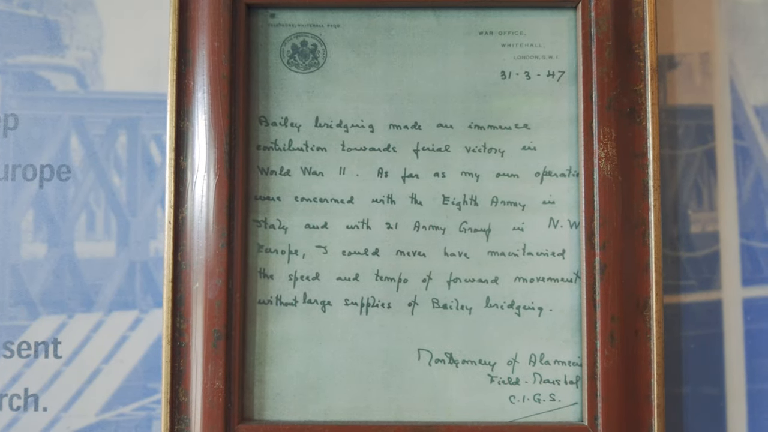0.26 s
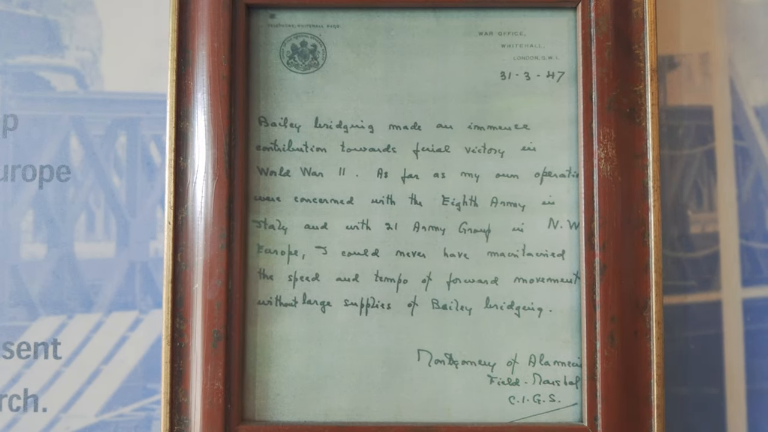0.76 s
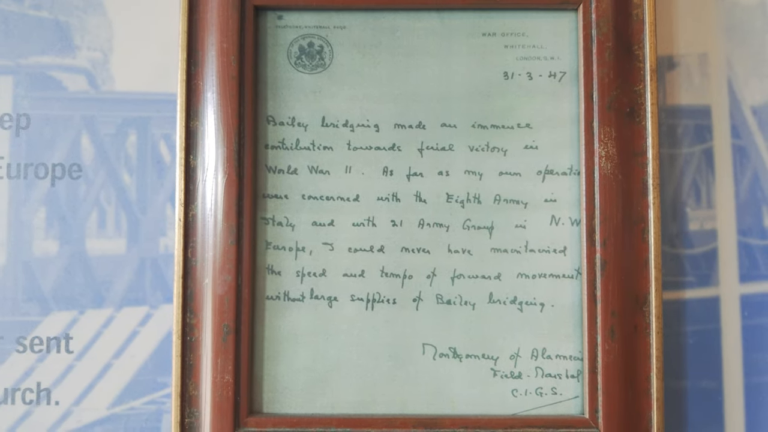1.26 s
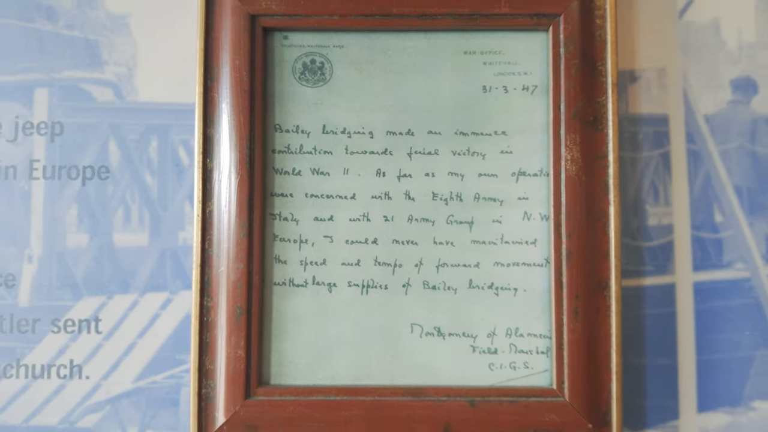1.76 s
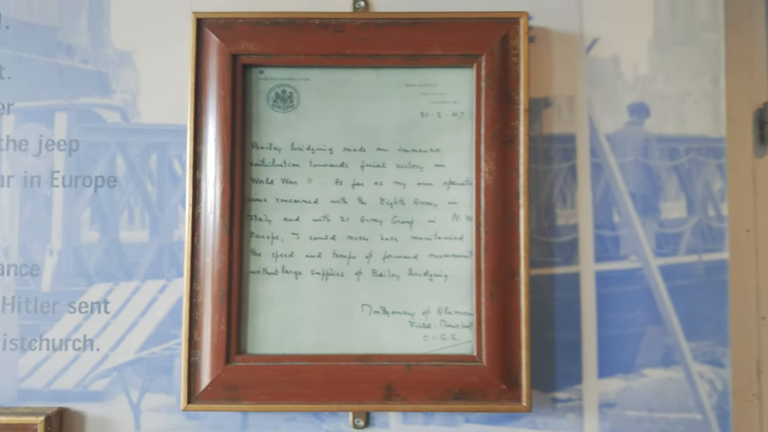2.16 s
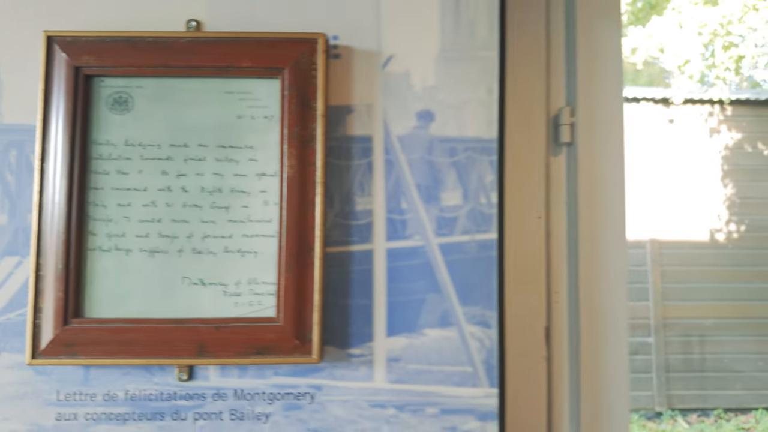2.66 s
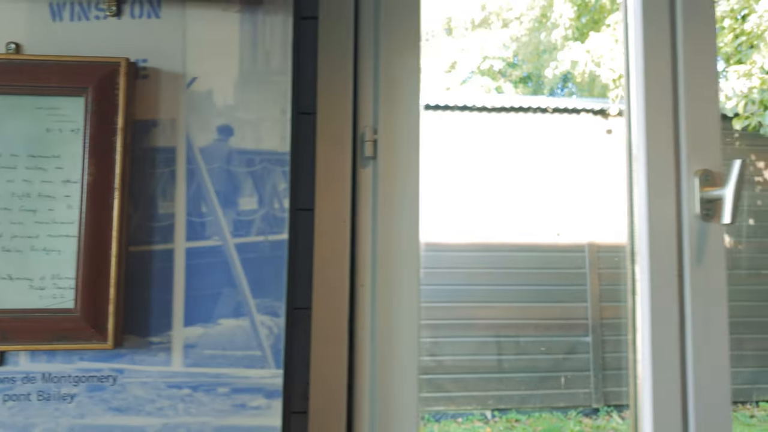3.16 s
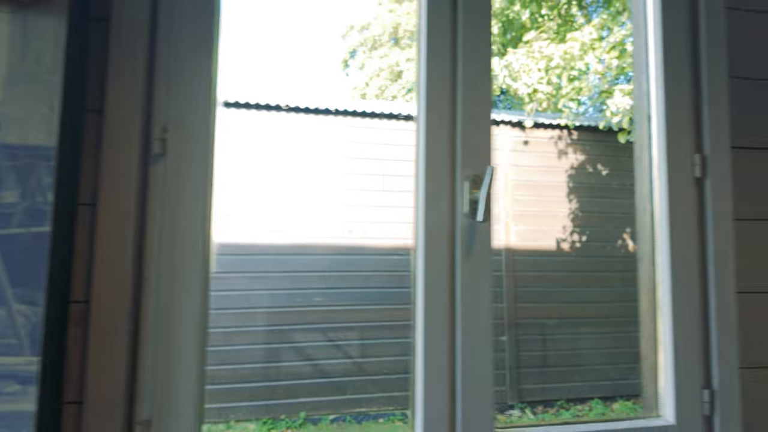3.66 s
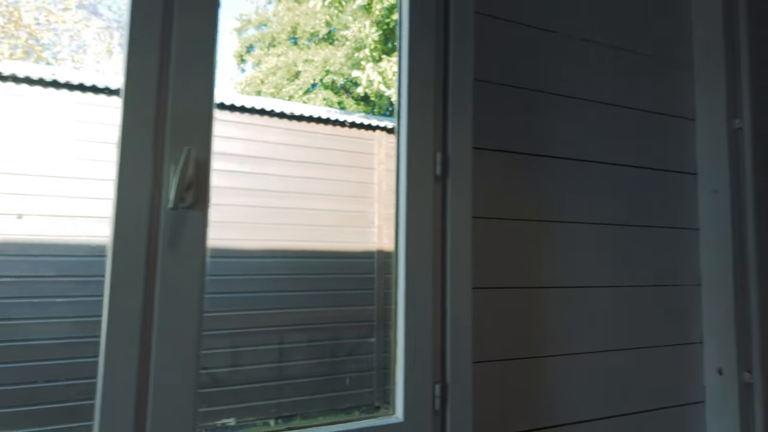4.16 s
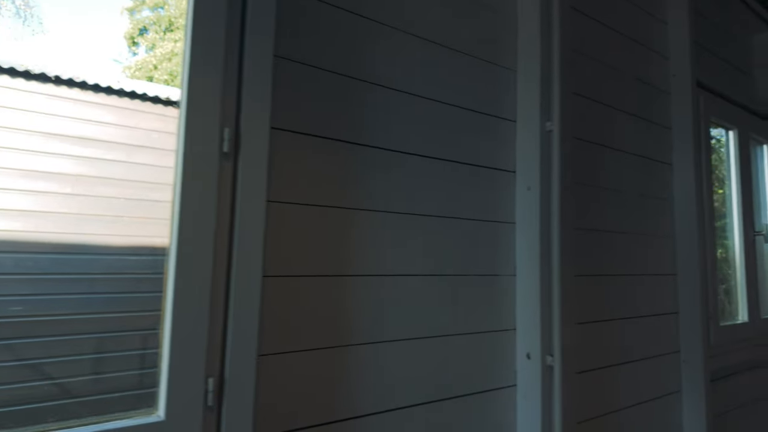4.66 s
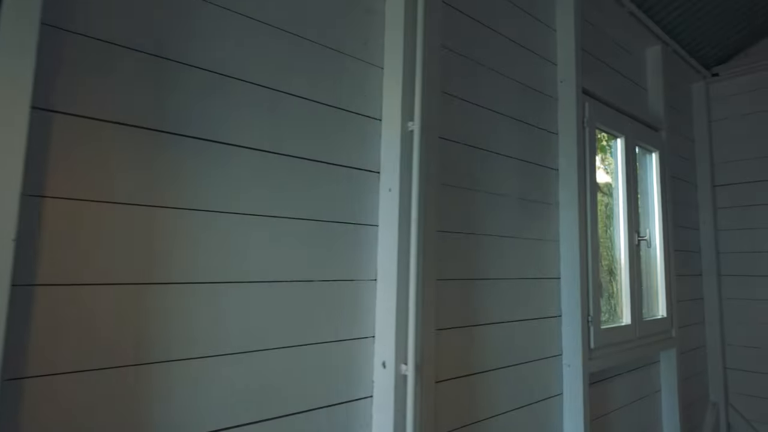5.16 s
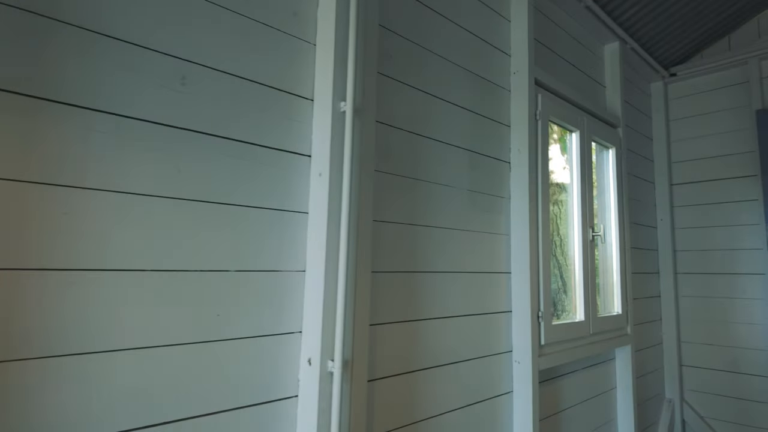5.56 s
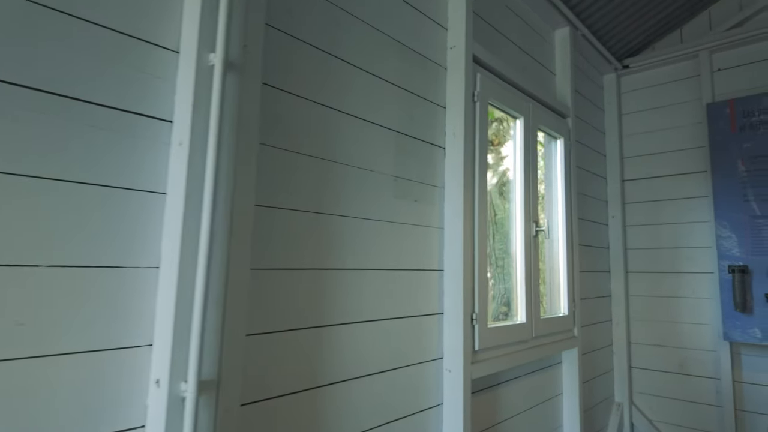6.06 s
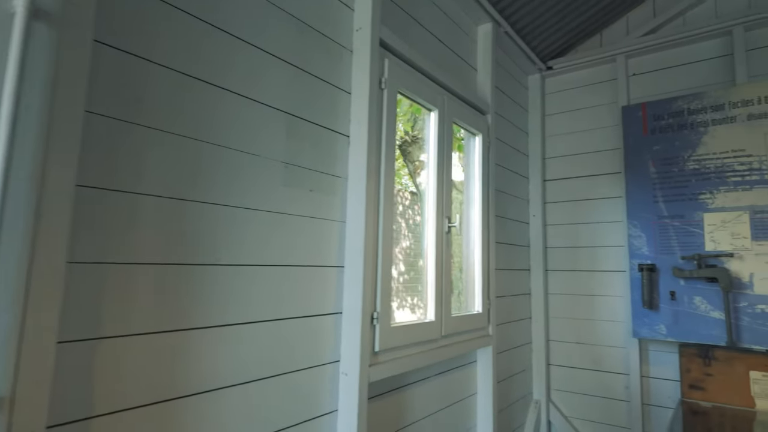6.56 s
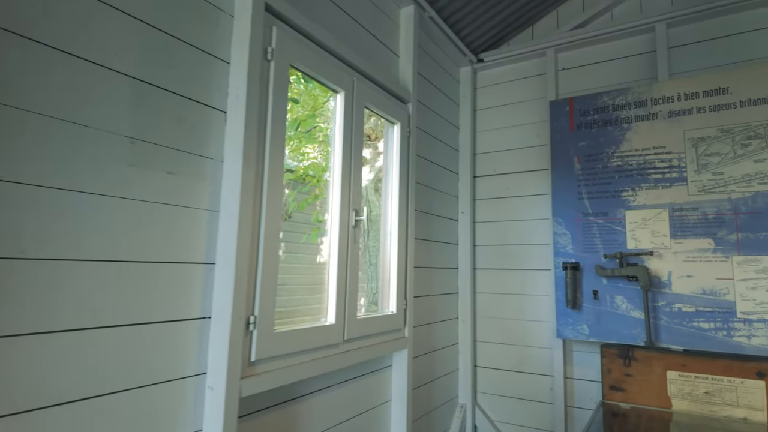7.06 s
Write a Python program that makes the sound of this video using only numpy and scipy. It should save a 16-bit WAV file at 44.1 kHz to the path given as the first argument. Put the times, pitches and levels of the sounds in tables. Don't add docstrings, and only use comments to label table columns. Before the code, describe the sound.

Someone walks slowly and unevenly over the hollow board floor of a small wooden hut. Deep, booming heel thuds mix with dull knocks, gritty scuffs and hard sole cracks. A board creaks just after four seconds, and the heaviest steps land near five and seven seconds. The microphone is close; faint outdoor rumble and hiss swell with the steps and sink between them.

```python
import sys
import numpy as np
from scipy import signal
from scipy.fft import rfft, irfft, next_fast_len
from scipy.io import wavfile
from scipy.ndimage import uniform_filter1d

SR = 44100
rng = np.random.default_rng(int(sys.argv[2]) if len(sys.argv) > 2 else 0)


def voltage_ratio(decibels):
    exponent = np.asarray(decibels, float) / 20
    return 10 ** exponent


def master(y):
    cut = np.clip(np.atleast_2d(y).T, -1, 1)
    pcm = np.round(cut * 32767)
    wavfile.write(sys.argv[1], SR, pcm.astype(np.int16))


N = 322812

# (frequency [Hz], correlation [0-1])
LIKENESS = [(50, 1), (125, 0.99), (250, 0.96), (500, 0.82), (1000, 0.46), (2000, .0), (8000, 0.071)]


def rms_one(x):
    return x / np.sqrt(np.mean(x ** 2) + 1e-20)


def at_hz(points, hz):
    point_hz, values = np.array(points).T
    return np.interp(np.log(hz), np.log(point_hz), values)


def bin_hz(size):
    return np.maximum(np.fft.rfftfreq(size, 1 / SR), 10)


def at_samples(t, values):
    return np.interp(np.arange(N) / SR, t, values)


def drift(rate_hz):
    pole = np.exp(-80 * np.pi * rate_hz / SR)
    noise = rng.standard_normal(N // 40 + 2002)
    slow = signal.lfilter([1], [1, -2 * pole, pole * pole], noise)[2000:]
    return np.interp(np.arange(N) / 40, np.arange(len(slow)), rms_one(slow))


def smoothed(x, time_s):
    pole = np.exp(-1 / (time_s * SR))
    return signal.lfilter([1 - pole], [1, -pole], x)


def ring(clicks, hz, t60_s):
    pole, turn = voltage_ratio(-60 / (t60_s * SR)), 2 * np.pi * hz / SR
    return signal.lfilter([0, np.sin(turn)], [1, -2 * pole * np.cos(turn), pole * pole], clicks + 1e-18)


def band(x, low_hz, high_hz):
    sos = signal.butter(3, [low_hz, high_hz], "band", fs=SR, output="sos")
    return signal.sosfilt(sos, x + 1e-18)


def burst(at_s, level_db, t60_s, low_hz, high_hz, rise_s):
    clicks = np.zeros(N)
    clicks[(at_s * SR).astype(int)] = voltage_ratio(level_db)
    decay = signal.lfilter([1], [1, -voltage_ratio(-60 / (t60_s * SR))], clicks)
    noise = rng.standard_normal(N) * smoothed(decay, rise_s)
    return band(noise, low_hz, high_hz) * np.sqrt(SR / 2 / (high_hz - low_hz))


def swells(rows, fade_db_per_s):
    t = np.arange(0, N + 64, 64) / SR
    s, rise_s, hold_s, level_db = np.transpose(rows)[:4, :, None]
    rise_loss_db = 25 * np.maximum(s - t, 0) / np.maximum(rise_s, 0.004)
    fade_loss_db = fade_db_per_s * np.maximum(t - s - hold_s, 0)
    return t, voltage_ratio(level_db - np.minimum(rise_loss_db + fade_loss_db, 120))


def coloured(spectrum, alike):
    hz = bin_hz(N)
    mid, side = rfft(rng.standard_normal((2, N))) * voltage_ratio(at_hz(spectrum, hz))
    alike = np.clip(alike * at_hz(LIKENESS, hz), 0, 1)
    return rms_one(irfft(np.sqrt(1 + alike) * mid + np.sqrt(1 - alike) * side * [[1], [-1]], N))


def rumble(riding_db):
    # (frequency [Hz], density [dB per Hz])
    colour = [(15, -53), (25, 5), (75, 1), (98, -5), (140, -16.5), (255, -24.5), (1640, -36), (3000, -36.5),
              (3900, -40.5), (6600, -82)]
    return voltage_ratio(-54 + 0.67 * riding_db + 1.3 * drift(5.6)) * coloured(colour, alike=0.97)


def hiss(open_db):
    # (frequency [Hz], density [dB per Hz])
    colour = [(900, -37), (2500, -12.5), (4200, -5), (8600, -1), (12000, 2), (15000, 5), (15800, 2)]
    return voltage_ratio(-64 + open_db + 0.7 * drift(40)) * coloured(colour, alike=0)


def gate(x):
    from_db, range_db, share = -77.5, 20.5, 0.14
    duck_ahead_s, duck_share = 0.035, 0.13
    fall_db = 179 * np.arange(N) / SR
    power = uniform_filter1d(band(x, 300, 2000) ** 2, size=1323)
    level_db = 10 * np.log10(power + 1e-12)
    held_db = np.maximum.accumulate(level_db + fall_db) - fall_db
    open_db = smoothed(share * np.clip(held_db - from_db, 0, range_db), 0.021)
    coming_db = np.interp(np.arange(N) + duck_ahead_s * SR, np.arange(N), open_db)
    return open_db - duck_share * np.maximum(coming_db - open_db, 0)


def hut(x, side_db):
    # (frequency [Hz], t60 [s])
    decay = [(200, 0.46), (800, 0.45), (1500, 0.31), (2700, 0.39), (6000, 0.22)]
    t = np.arange(SR // 2 + 8000) / SR
    edges_hz = 30 * 2 ** np.arange(0, 9.1, 1)
    white = rng.standard_normal((2, 6, 2, len(t)))
    tails = 0
    for k, (low_hz, high_hz) in enumerate(zip(edges_hz, edges_hz[1:])):
        t60_s = at_hz(decay, np.sqrt(low_hz * high_hz))
        envelope = voltage_ratio(-60 * t / t60_s) * np.sqrt(14 / t60_s / SR) * (t > 0.004)
        tails = tails + band(white[k % 2] * envelope, low_hz, high_hz)
    size = next_fast_len(N + SR)
    places = np.arange(0, N + 8192, 8192)
    mid, side = 0, 0
    for k, tail in enumerate(tails):
        share = np.interp(np.arange(N), places, np.arange(len(places)) % 6 == k)
        wet_mid, wet_side = rfft(x * np.sqrt(share), size) * rfft(tail, size)
        mid, side = mid + wet_mid, side + wet_side
    alike = np.clip(at_hz(LIKENESS, bin_hz(size)), 0, 1)
    side = side * voltage_ratio(side_db) * np.sqrt((1 - alike) / (1 + alike))
    return irfft([mid + side, mid - side], size)[:, :N]


def creak(rows):
    t, gains = swells(rows, fade_db_per_s=218)
    hz = at_samples(t, np.array(rows)[np.argmax(gains, axis=0), -1])
    phase = 2 * np.pi * np.cumsum(hz * (1 + 0.011 * drift(25.8))) / SR
    return at_samples(t, gains.sum(axis=0)) * voltage_ratio(2.5 + 3.5 * drift(30)) * np.sin(phase)


def creaks():
    # (full level at [s], rise [s], hold [s], level [dB], pitch [Hz])
    long_creaks = [
        (4.16, 0.066, .26, -66.5, 572),
        (4.5, 0.045, 0.26, -78, 584),
    ]
    short_creaks = [
        (0.578, .005, 0.093, -70, 1470),
        (4.72, .07, 0.03, -70.5, 502),
        (5.44, 0.051, 0.11, -75, 508),
        (6.67, .04, .08, -76, 515),
    ]
    return creak(long_creaks) + creak(short_creaks)


def scuffs():
    # (full level at [s], rise [s], hold [s], level [dB], brightness [dB])
    drags = [(0.39, 0.29, 0.059, -52.5, -6), (0.6, 0.1, 0.063, -66, -11), (0.972, 0, 0.017, -60, -16),
             (1.08, 0.0058, 0.11, -72, 12), (1.68, 0.15, .015, -55.5, 0), (2.11, .06, 0.022, -54, -16),
             (2.16, 0.033, 0.19, -66, -8), (2.451, 0.039, .012, -52, -8),
             (3.089, 0.029, 0.055, -39.5, -15.5), (3.22, .04, 0.071, -49, -10.5),
             (4.087, .13, 0.014, -51, -12.5), (4.82, 0.1, .02, -57.5, -15), (4.912, 0, 0.097, -52.5, -14),
             (5.113, 0.13, 0.074, -52, -15), (6, 0.058, .03, -61, -19), (6.112, 0.088, 0.017, -49.5, -7),
             (6.977, 0, 0.09, -57, -14), (7.134, 0.12, 0.13, -59, -12)]
    # (frequency [Hz], density [dB per Hz])
    colour = [(150, 6), (300, -8.5), (600, -7.5), (1100, -7), (1600, -12), (2200, -17.5), (3300, -14.5),
              (3800, -53.5), (5500, -53.5), (9000, -62), (12000, -57)]
    t, gains = swells(drags, fade_db_per_s=143)
    bright = voltage_ratio(np.minimum(np.array(drags)[:, -1], 0) - 0.5)
    clicks = rng.random(N) < 2500 / SR
    sizes = voltage_ratio(6.3 * np.minimum(rng.exponential(1, N), 5))
    grit = clicks * sizes * rng.choice([-1, 1], N)
    hz = bin_hz(N)
    grit = rfft(grit) * voltage_ratio(at_hz(colour, hz))
    body = rms_one(irfft(grit * (hz < 3750), N))
    top = rms_one(irfft(grit * (hz >= 3750), N))
    mix = at_samples(t, gains.sum(axis=0)) * body + at_samples(t, bright @ gains) * top
    return voltage_ratio(-6 + 2.5 * drift(27)) * mix


def cracks():
    # (time [s], level [dB], pitch over lowest band [octaves], t60 [s])
    strikes = [(0.5741, -53, 0.67, 0.049), (0.789, -64.5, 1.7, 0.051), (0.9624, -52.5, 0.47, 0.038),
               (1.0146, -54, 0.41, .03), (2.065, -64, .15, 0.035), (2.1021, -55.5, 0.52, 0.036),
               (2.4712, -61, 1.4, 0.034), (2.746, -51.5, 0.3, 0.12), (3.0968, -39, .6, 0.042),
               (3.9873, -55, 1.05, 0.017), (4.9363, -37.5, 0.58, 0.062), (5.1057, -46, 0.57, .05),
               (5.8779, -52, 0.71, 0.016), (6.0005, -46.5, 0.37, 0.016), (6.1096, -54.5, 0.65, 0.079),
               (6.9561, -41, 0.87, 0.052)]
    # (time [s], level [dB], pitch over lowest band [octaves])
    skids = [(0.614, -56, 0.42), (0.661, -68, 0.68), (3.1987, -42, 0.7), (3.224, -45, 0.94),
             (3.247, -43, 0.96), (3.2686, -45.5, 0.78), (3.2994, -56, 0.97), (4.042, -58, .85),
             (4.975, -43.5, 0.8), (5.019, -54, .05), (5.1414, -51, 0.53), (5.197, -63, 0.87),
             (6.9948, -48, 0.32), (7.0504, -57.5, .1), (7.11, -60, 1)]
    # (time [s], level [dB], pitch [Hz])
    ticks = [
        (1.4193, -60.5, 2270),
        (3.046, -58.5, 1570),
    ]
    out, t = np.zeros(N), np.arange(SR // 4) / SR
    events = sorted(strikes + [(*row, 0.059) for row in skids])
    noise = rng.standard_normal((len(events), len(t)))
    for (s, level_db, octave, t60_s), grit in zip(events, noise):
        over = np.array([0, 0.85, 1.5]) - octave
        low_db, mid_db, top_db = level_db - np.maximum(14 * over, -10 * over)
        strike = grit * voltage_ratio(-60 * t / t60_s) + 4.1 * (t == 0)
        crack = voltage_ratio(low_db + 19.5) * band(strike, 740, 1280)
        crack += voltage_ratio(mid_db + 9.5) * band(strike, 1390, 1990)
        crack += voltage_ratio(top_db + 11.5) * band(strike, 2260, 3240)
        start = int(s * SR)
        out[start:][:len(t)] += crack[:N - start]
    for s, level_db, hz in ticks:
        click = 1.0 * (np.arange(N) == int(s * SR))
        out += voltage_ratio(level_db + 5) * ring(click, hz, 0.013)
    return out


def contacts():
    # (time [s], boom [dB], joist [dB], board [dB], knock [dB])
    landings = [(0.073, -25, -45, -29, -56), (0.445, -20, -22, -24, -53), (0.529, -29, -23, -36, -46),
                (0.79, -38, -44.5, -32, -61), (0.962, -21, -52, -33.5, -50), (1.015, -21, -28, -36.5, -49),
                (1.697, -14, -15, -21, -41), (2.68, -13, -92, -46, -55.5), (2.736, -19, -28, -34.5, -42),
                (3.097, -32.5, -42, -41, -40), (3.223, -52, -38.5, -38, -44),
                (3.767, -18, -28, -32.5, -55.5), (3.868, -20, -33, -32.5, -55.5),
                (3.984, -17, -25, -27, -42), (4.844, -19, -32.5, -38, -52), (4.937, -6.5, -19.5, -26, -33),
                (5.575, -39, -27.5, -29.5, -48.5), (5.594, -36, -20, -28, -43),
                (5.878, -29, -22.5, -26.5, -41.5), (6.0, -20, -26.5, -30, -36.5),
                (6.109, -27, -40.5, -40.5, -45), (6.833, -27, -34, -41, -63), (6.954, -6, -21, -37, -43),
                (7.048, -18.5, -39, -40.5, -48.5)]
    # (time [s], boom [dB], joist [dB], knock [dB])
    settlings = [(0.114, -43, -31, -80), (0.173, -27.5, -41, -55), (0.491, -20, -41.5, -41.5),
                 (0.575, -42, -36, -50.5), (0.848, -46, -48, -78), (1.047, -19.5, -35.5, -51.5),
                 (1.743, -25, -30, -51), (1.788, -24, -30.5, -49.5), (2.138, -30.5, -59, -83),
                 (2.779, -25, -46, -47), (3.268, -37, -41.5, -53), (3.822, -31, -41, -75),
                 (4.04, -43, -42, -46), (4.171, -27.5, -41, -58), (4.288, -24, -46, -62),
                 (4.815, -50, -35.5, -64), (4.982, -11, -36, -38.5), (5.104, -40, -71, -54.5),
                 (5.219, -29, -44, -65), (5.615, -34, -26, -60), (5.645, -20, -35, -46.5),
                 (5.68, -24, -45, -69), (5.954, -39, -31, -48), (6.179, -31, -40.5, -60),
                 (6.319, -34.5, -47.5, -55.5), (7.16, -56, -42, -70), (7.267, -39, -35, -61)]
    settled = [(s, boom_db, joist_db, joist_db - 8, knock_db)
               for s, boom_db, joist_db, knock_db in settlings]
    return np.array([(*row, row[-1] - 18) for row in sorted(landings + settled)])


def part_db(hz):
    part_hz = [50, 90, 230, 480, 950]
    return np.array([np.interp(np.log(hz), np.log(part_hz), row[1:]) for row in contacts()])


def knocks():
    # (low edge [Hz], high edge [Hz], t60 [s], level [dB])
    bands = [(164.3, 276, 0.15, -4), (282, 394, 0.12, -1.5), (399, 697, 0.081, 3.5), (703, 1320, 0.058, 0)]
    at_s = contacts()[:, 0]
    out = np.zeros(N)
    for low_hz, high_hz, t60_s, trim_db in bands:
        level_db = part_db(np.sqrt(low_hz * high_hz)) + trim_db
        out += burst(at_s, level_db, t60_s, low_hz, high_hz, rise_s=0.0015)
    return out


def floor_modes():
    # (frequency [Hz], level [dB], t60 [s])
    modes = [(63.7, -4.5, 0.12), (42.5, -44, 0.45), (45.5, -2, 0.15), (52.53, 4, 0.44), (60.2, 2, 0.42),
             (68.5, 3, 0.41), (83.2, -1, 0.6), (87.45, 6, 0.64), (96.14, 4.5, 0.34), (109.6, 5, 0.33),
             (137.9, 3, 0.6), (154.27, 3.5, 0.47), (164.35, 5.5, 0.28), (180.7, -0.5, 0.47),
             (198.8, -8.5, 0.57), (212.4, 2.5, 0.47), (238.2, -1, 0.33), (265, -6, 0.5), (280, 3.5, 0.48),
             (324.7, -0.5, 0.06)]
    at_s = contacts()[:, 0]
    chance = rng.standard_normal((len(at_s), 2, len(modes)))
    out = np.zeros(N)
    for k, (hz, level_db, t60_s) in enumerate(modes):
        late_s = 0.002 + 0.0016 * abs(chance[:, 1, k])
        luck_db = min(hz / 50, 4) * np.clip(chance[:, 0, k], -1.5, 1.5)
        clicks = np.zeros(N)
        clicks[((at_s + late_s) * SR).astype(int)] = voltage_ratio(part_db(hz) + level_db - 10 + 0.025 * hz + luck_db)
        out += ring(clicks, hz, t60_s)
    out = signal.sosfilt(signal.butter(1, 70, fs=SR, output="sos"), out)
    return signal.sosfilt(signal.butter(4, 330, fs=SR, output="sos"), out)


def scene():
    low = floor_modes() + creaks()
    dull, sharp = knocks() + scuffs(), cracks()
    direct = low * voltage_ratio([[-0.25], [0.25]]) + voltage_ratio(-6.5) * dull + voltage_ratio(-1.5) * sharp
    room = voltage_ratio(-9.5) * hut(low, side_db=8.5) + voltage_ratio(-1) * hut(dull + sharp, side_db=2.1)
    steps = direct + room
    open_db = gate(steps.mean(axis=0))
    riding_db = open_db - 2.5
    return voltage_ratio(1.38 * riding_db - 3) * steps + rumble(riding_db) + hiss(open_db)


def top_cut(x):
    return signal.sosfilt(signal.butter(12, 16720, fs=SR, output="sos"), x)


def record(dry):
    x = signal.sosfilt(signal.butter(4, 43, "high", fs=SR, output="sos"), dry)
    x = irfft(rfft(x) * (np.fft.rfftfreq(N, 1 / SR) < 15780), N)
    return top_cut(x)


dry = scene()
out = record(dry)
master(out)
```